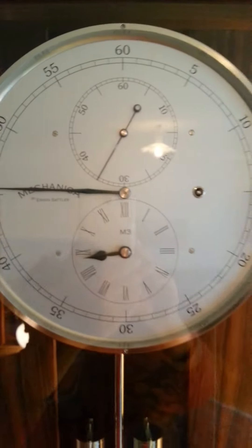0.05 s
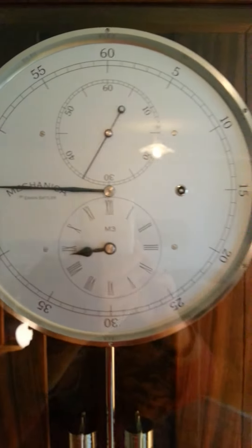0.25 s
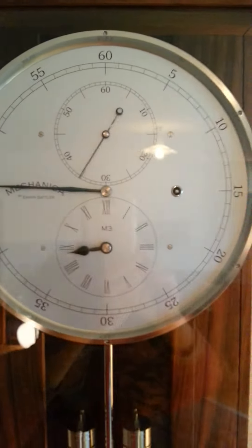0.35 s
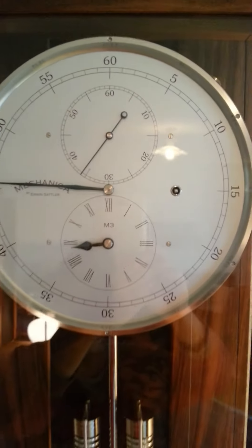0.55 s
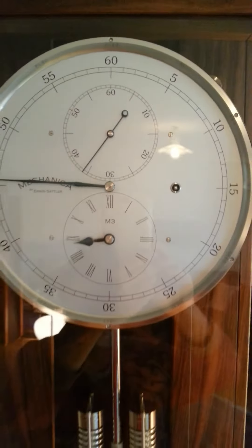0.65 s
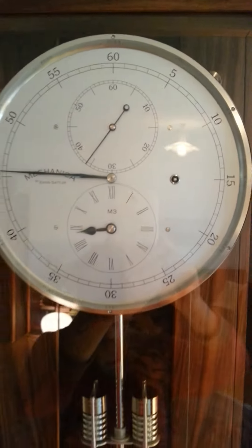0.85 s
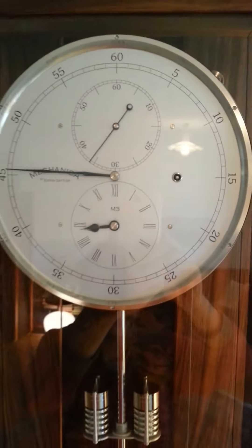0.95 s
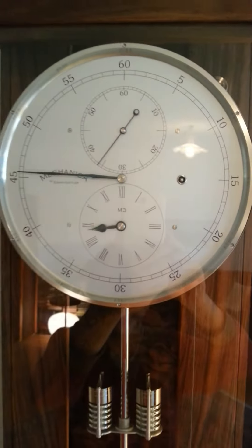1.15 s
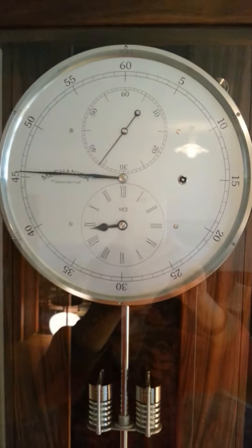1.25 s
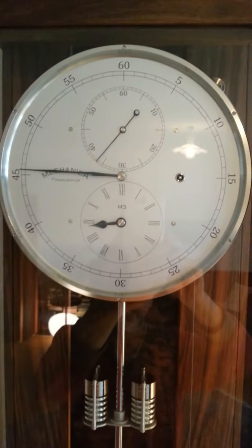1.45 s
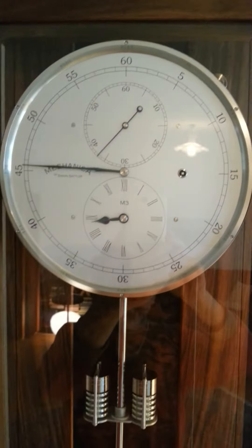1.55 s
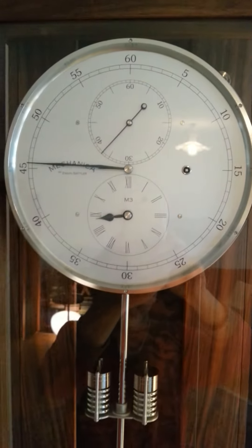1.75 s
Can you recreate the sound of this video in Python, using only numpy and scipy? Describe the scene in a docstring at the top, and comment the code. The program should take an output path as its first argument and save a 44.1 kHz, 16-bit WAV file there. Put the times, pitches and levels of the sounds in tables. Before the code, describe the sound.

A pendulum wall clock gives one bright tick in a quiet room. A hand clicks and rubs right at the microphone with a low rumble and a soft bump. A duller tock follows, and the rubbing fades.

```python
"""A quiet room with a seconds-pendulum wall clock, heard from a camera's two microphone ports.
A faint thin ring fades, then the clock ticks: quick escapement contacts ring the movement and its
glazed wooden case. Right at the microphone a hand shifts: the grip clicks, rubbing skin drones in
the camera housing, and a fingertip bumps it. The clock tocks, and the rubbing dies away."""
import sys
import numpy as np
from scipy import signal
from scipy.fft import rfft, irfft
from scipy.io import wavfile

SR = 44100
rng = np.random.default_rng(int(sys.argv[2]) if len(sys.argv) > 2 else 0)


def put_to_file(sound):
    """Save the sound as 16-bit audio at rate SR, in the file named by the first command-line argument."""
    columns = np.atleast_2d(sound).T  # one column per channel
    safe = np.clip(columns, -1, 1)
    whole_steps = np.round(safe * 32767)
    wavfile.write(sys.argv[1], SR, whole_steps.astype(np.int16))


N = 79380
TIME_S = np.arange(N) / SR
BIN_HZ = np.arange(N + 1) * SR / (2 * N)


def undb(db):
    """Decibels to gain."""
    return 10 ** (np.asarray(db) / 20)


def unit(x):
    """Scale to rms 1."""
    return x / np.sqrt(np.mean(x ** 2))


def noise():
    """Two unrelated white noises."""
    return rng.standard_normal((2, N))


def curve(rows):
    """Gain over time from points of seconds and dB; silent before the first."""
    return undb(np.interp(TIME_S, *np.array(rows).T, left=-140))


def decay(start, t60):
    """Sudden start and exponential fall, 60 dB in t60 seconds."""
    age = TIME_S - start
    return (age >= 0) * np.exp(-np.log(1000) * np.maximum(age, 0) / t60)


def by_frequency(rows):
    """Join points of Hz and value on a log axis, for every bin."""
    hz, value = np.array(rows).T
    return np.interp(np.log(np.maximum(BIN_HZ, 1)), np.log(hz), value)


def colour(x, rows, tilt_db=0):
    """Causal filter from points of Hz and dB, tilted per octave; keeps the power of white noise."""
    octaves = np.log2(np.maximum(BIN_HZ, 200) / 2000)
    gain = unit(undb(by_frequency(rows) + tilt_db * octaves))
    cepstrum = irfft(np.log(gain))
    cepstrum[1:N] *= 2  # fold to minimum phase
    cepstrum[N + 1:] = 0
    return irfft(rfft(x, 2 * N) * np.exp(rfft(cepstrum)))[..., :N]


def resonance(x, hz, width_hz):
    """Steep band-pass at rms 1: one resonator applied twice."""
    radius = np.exp(-np.pi * 1.5 * width_hz / SR)
    poles = [1, -2 * radius * np.cos(2 * np.pi * hz / SR), radius * radius]
    once = signal.lfilter([1, 0, -1], poles, x)
    return unit(signal.lfilter([1, 0, -1], poles, once))


# The still room around the microphone. Each row: frequency in Hz, relative level in dB.
ROOM_COLOUR = [(25, -8), (80, -0.5), (200, -4), (500, -12), (1200, -14.5), (4000, -16.5), (7000, -18.5),
               (10000, -15), (14500, -16.5)]

def room_tone(level_db=-77.5):
    """The quiet room: steady noise, strongest in the bass."""
    return undb(level_db) * colour(noise(), ROOM_COLOUR)


# Bands of the opening ring. Each row: centre in Hz, width in Hz, level in dB.
THIN_RING_BANDS = [(827, 94, -78.5), (1780, 47, -87), (3900, 240, -84.5), (7430, 8.3, -80.5),
                   (6000, 2400, -75.5), (1940, 1200, -81.5), (220, 220, -80.5)]

def thin_ring(hold_s=0.054, fall_db_per_s=163):
    """A faint thin ring that fades before the tick."""
    fade = undb(-fall_db_per_s * np.maximum(TIME_S - hold_s, 0))
    return fade * sum(undb(db) * resonance(noise(), hz, width) for hz, width, db in THIN_RING_BANDS)


def beat(contacts, blow_colour, modes, level_db, slide_db):
    """A tooth slides over a pallet and drops; each contact cracks and rings movement and case."""
    slide_swell_db_per_s, crack_t60_s = 1296, 0.037
    tail_db, tail_t60_s, tail_rise_s, tail_db_per_octave = -10.5, 0.36, 0.0038, -0.6
    drop_s = contacts[0][0]
    slide = (TIME_S < drop_s) * undb(slide_swell_db_per_s * np.minimum(TIME_S - drop_s, 0))
    out = undb(level_db + slide_db) * colour(noise() * slide, blow_colour)
    for start, db, tilt_db in contacts:
        crack = colour(noise() * decay(start, crack_t60_s), blow_colour, tilt_db)
        # a duller tail builds up in case and room
        swell = 1 - np.exp(-np.maximum(TIME_S - start, 0) / tail_rise_s)
        tail = noise() * decay(start, tail_t60_s) * swell
        tail = colour(tail, blow_colour, tilt_db + tail_db_per_octave)
        out += undb(level_db + db) * (crack + undb(tail_db) * tail)
    for hz, mode_db, t60 in modes:
        power = sum((undb(db) * decay(start, t60)) ** 2 for start, db, _ in contacts) / 2
        phase = rng.uniform(0, 2 * np.pi) + np.array([[0], [np.pi / 2]])
        out += undb(mode_db) * np.sqrt(power) * np.sin(2 * np.pi * hz * TIME_S + phase)
    return out


# The tick's contacts. Each row: start in seconds, relative level in dB, tilt in dB per octave.
TICK_CONTACTS = [(.2285, -2.5, 3), (.2312, 2, 0), (.2378, -2, -1.5), (.2405, 2, -4)]
# The blow on the first pallet. Each row: frequency in Hz, relative level in dB.
TICK_COLOUR = [(60, -27), (130, -31), (250, -22.5), (650, -6.5), (1050, -9), (1500, 4.5), (2000, 3),
               (2500, -2), (3100, -2.5), (4400, -10.5), (6500, -9.5), (9000, -20.5), (14500, -35)]
# Movement and case under that blow. Each row: frequency in Hz, relative level in dB, t60 in seconds.
TICK_MODES = [(407.6, -56, 0.3), (570, -57, 0.11), (642.5, -52.5, 0.23), (875, -61.5, 0.39),
              (1386, -47.5, 0.15), (1600, -81, 0.47), (1772, -50.5, 0.19), (1923, -53, 0.24),
              (2001, -51.5, 0.38), (2150, -51.5, 0.26), (2985, -59, 0.05), (5920, -70, 0.14),
              (6230, -55.5, 0.096), (6970, -49, 0.12)]

def tick():
    """On the wall, a tooth meets the first pallet: the brighter beat."""
    return beat(TICK_CONTACTS, TICK_COLOUR, TICK_MODES, level_db=-37.5, slide_db=-9)


# Handling rumble, right at the microphone. Each row: time in seconds, level in dB.
RUMBLE_LEVEL = [(.2, -71), (.26, -78), (.425, -77), (.47, -56), (.53, -58), (.57, -59), (.62, -52),
                (.75, -52.5), (.83, -55), (.88, -53), (.95, -53), (1.06, -52.5), (1.14, -56.5),
                (1.22, -49.5), (1.29, -60), (1.33, -53), (1.38, -68.5), (1.49, -52.5), (1.57, -70),
                (1.68, -72), (1.8, -79)]
# Its spectrum. Each row: frequency in Hz, relative level in dB.
RUMBLE_COLOUR = [(20, -31), (38, -21), (52, -3), (75, -4.5), (110, -7), (150, -8.5), (250, -20),
                 (1000, -48.5)]

def handling_rumble():
    """The shifting hand shakes the camera."""
    return curve(RUMBLE_LEVEL) * unit(colour(noise(), RUMBLE_COLOUR))


def slips(per_second=2000, spread_db=3):
    """Dense stick-slip jerks of skin, uneven in size."""
    jerks = (rng.random((2, N)) < per_second / SR) * np.sign(noise())
    return unit(jerks * undb(spread_db * noise()))


# Force of the rubbing hand. Each row: time in seconds, relative level in dB.
RUB_FORCE = [(.3, -94), (.425, -75), (.45, -60), (.52, -54.5), (.6, -48.5), (.66, -42.5), (.78, -42),
             (.89, -42.5), (.98, -46), (1.06, -43.5), (1.16, -49), (1.21, -51), (1.247, -45.5),
             (1.29, -56.5), (1.33, -50.5), (1.38, -61.5), (1.5, -54.5), (1.59, -69.5), (1.626, -58),
             (1.68, -67), (1.8, -67.5)]
# The housing around the microphone. Each row: resonance in Hz, width in Hz, relative level in dB.
HOUSING_MODES = [(152.3, 10.4, -2.5), (171.4, 7, 4), (250.3, 16.3, -2.5), (284.8, 13, -7), (344, 10, -17),
                 (374.5, 17.8, -1), (424.3, 24.4, -6.5), (462.4, 8.7, -8), (527.4, 10.5, 0.5),
                 (579, 42, -10), (619.6, 22.5, -5), (754, 11, -17), (805, 4.8, -9.5)]
# The scrape of skin on it. Each row: frequency in Hz, relative level in dB.
SCRAPE_COLOUR = [(60, -18), (130, -2.5), (210, -6.5), (400, 3.5), (650, 2.5), (780, -5.5), (1600, -12.5),
                 (2200, -8.5), (3000, -24), (4000, -25.5), (7000, -32), (10000, -46), (14500, -47)]

def rubbing(drone_db=-0.5, scrape_db=-4.5):
    """Skin jerks over the camera housing, scraping it and making it drone."""
    jerks = slips()
    drone = sum(undb(db) * np.sqrt(width) * resonance(jerks, hz, width)
                for hz, width, db in HOUSING_MODES)
    scrape = colour(slips() + 0.51 * noise(), SCRAPE_COLOUR)
    return curve(RUB_FORCE) * (undb(drone_db) * unit(drone) + undb(scrape_db) * unit(scrape))


# Hiss of skin, close to the ports. Each row: time in seconds, relative level in dB.
HISS_LEVEL = [(.3, -94), (.36, -69), (.436, -63.5), (.442, -52), (.47, -51), (.5, -56.5), (.533, -52.5),
              (.56, -59), (.68, -62), (.85, -71.5), (1.25, -68), (1.5, -69), (1.59, -74.5), (1.63, -68.5),
              (1.7, -77), (1.8, -76)]
# Its spectrum. Each row: frequency in Hz, relative level in dB.
HISS_COLOUR = [(200, -28), (1000, 2), (2200, 4.5), (3800, -4.5), (5500, -3), (7300, -1.5), (9500, -11),
               (14500, -17)]

def skin_hiss():
    """Sliding skin hisses, with a grain of small slips."""
    return curve(HISS_LEVEL) * colour(noise() + 0.47 * slips(), HISS_COLOUR)


def knock(start, modes):
    """Modes struck once from rest."""
    age = TIME_S - start
    return sum(undb(db) * decay(start, t60) * np.sin(2 * np.pi * hz * age) for hz, db, t60 in modes)


# Clicks of the grip on the camera. Each row: start in seconds, level in dB, t60 in seconds.
GRIP_CLICKS = [(0.4555, -41.5, 0.025), (0.4582, -36.5, 0.0042), (0.4624, -47, 0.016), (.5255, -53, 0.035)]
# Their spectrum. Each row: frequency in Hz, relative level in dB.
GRIP_COLOUR = [(300, -7.5), (1600, -5), (2700, 0), (3600, 2), (5500, 4), (7500, -17), (14500, -24)]
# The housing at the main click. Each row: frequency in Hz, level in dB, t60 in seconds.
SNAP_MODES = [(2730, -38, .008), (3360, -43.5, 0.0095), (5620, -41, 0.0092)]

def grip(snap_s=0.4579):
    """The grip breaks loose with a crackle and a dry snap of the housing."""
    bursts = sum(undb(db) * decay(start, t60) for start, db, t60 in GRIP_CLICKS)
    return colour(bursts * noise(), GRIP_COLOUR) + knock(snap_s, SNAP_MODES)


# Rasp of skin on the camera. Each row: time in seconds, level in dB.
RASP_LEVEL = [(.58, -78), (.68, -59.5), (.8, -61), (.9, -66.5), (1.05, -68), (1.2, -88)]

def skin_rasp():
    """A thin rasp while the skin slides fastest."""
    return curve(RASP_LEVEL) * resonance(slips(), hz=2780, width_hz=700)


# Low modes of the camera. Each row: frequency in Hz, level in dB, t60 in seconds.
BUMP_MODES = [(56.6, -43, 0.15), (172.5, -43.5, 0.32)]

def fingertip_bump(start_s=1.048):
    """A fingertip bumps the camera: a low thud at the microphone."""
    return knock(start_s, BUMP_MODES)


# The tock's contacts. Each row: start in seconds, relative level in dB, tilt in dB per octave.
TOCK_CONTACTS = [(1.1872, 0, 2), (1.1900, -3, 0), (1.1932, 2, -1), (1.2245, -15, -.5)]
# The blow on the other pallet. Each row: frequency in Hz, relative level in dB.
TOCK_COLOUR = [(100, -31), (500, -3), (750, -3), (1020, 2), (1700, -11.5), (2300, 2.5), (2750, -3),
               (3200, -7), (3800, -16.5), (6800, -22), (9000, -28.5), (14500, -49)]
# Movement and case under that blow. Each row: frequency in Hz, relative level in dB, t60 in seconds.
TOCK_MODES = [(358, -50, 0.23), (998, -58.5, 0.15), (1409, -57, 0.25), (1970, -56, 0.35), (2346, -49, 0.19),
              (2460, -58, 0.062), (2650, -39, 0.045), (3200, -55, .04)]

def tock():
    """One swing later, a tooth meets the other pallet: the duller beat."""
    return beat(TOCK_CONTACTS, TOCK_COLOUR, TOCK_MODES, level_db=-39.5, slide_db=-12)


# Balance of the microphone ports. Each row: frequency in Hz, left minus right in dB.
PORT_BALANCE = [(60, -2), (160, -.5), (250, 4), (450, 2.35), (650, 3.6), (1300, 4), (2200, 5.4),
                (4000, 5.5), (5500, 0), (7000, -6.5), (10000, 0.3), (14000, -1)]
# How alike the ports sound. Each row: frequency in Hz, likeness from 0 to 1.
PORT_LIKENESS = [(60, 0.96), (170, 0.92), (300, 0.96), (600, 0.25), (1500, 0.053), (8000, 0.019)]

def microphone_ports(pair, left_lead_s=0.000239):
    """Two signals blend into left and right: alike in the bass, each port with its own colour."""
    angle = np.arcsin(np.clip(by_frequency(PORT_LIKENESS), 0, 1)) / 2
    spectrum = rfft(pair, 2 * N)
    blended = np.cos(angle) * spectrum + np.sin(angle) * spectrum[::-1]
    side_db = by_frequency(PORT_BALANCE) / 2
    lead = np.pi * BIN_HZ * left_lead_s
    gains = undb([side_db, -side_db]) * np.exp(1j * np.array([lead, -lead]))
    return irfft(blended * gains)[:, :N]


def scene():
    """The clock in its room and the hand on the camera meet at the microphone."""
    in_room = room_tone() + thin_ring() + tick() + tock()
    on_camera = handling_rumble() + rubbing() + skin_hiss() + grip() + skin_rasp() + fingertip_bump()
    return microphone_ports(in_room + on_camera)


def record(dry):
    """The recorder cuts rumble below 42 Hz and treble above 14.5 kHz."""
    low_cut = signal.butter(6, 42, "highpass", fs=SR, output="sos")
    top_cut = signal.ellip(10, .2, 70, 14500, fs=SR, output="sos")
    return signal.sosfilt(top_cut, signal.sosfilt(low_cut, dry))


dry = scene()
out = record(dry)
put_to_file(out)
```